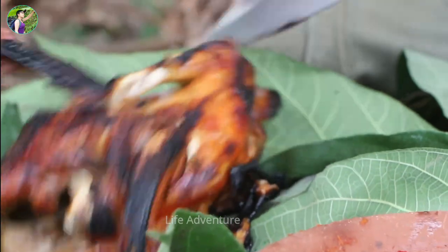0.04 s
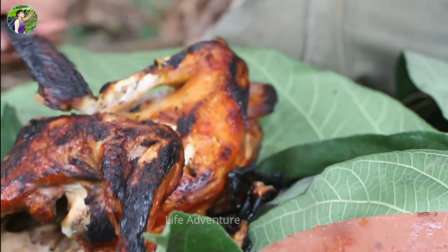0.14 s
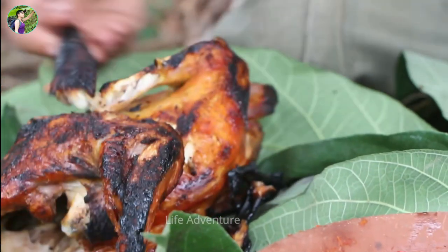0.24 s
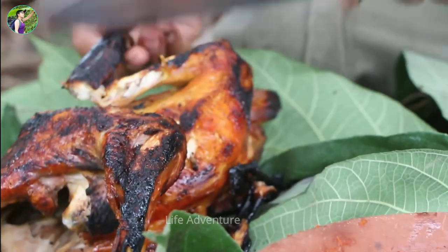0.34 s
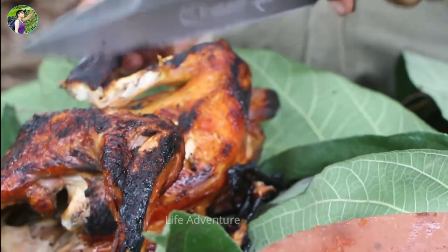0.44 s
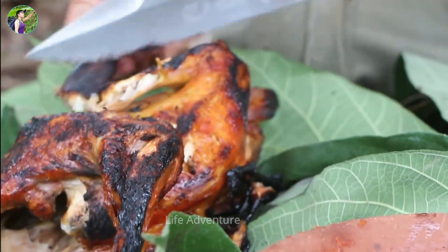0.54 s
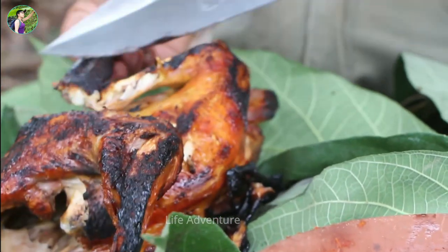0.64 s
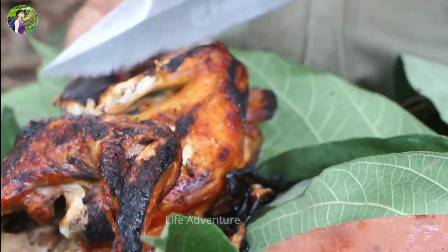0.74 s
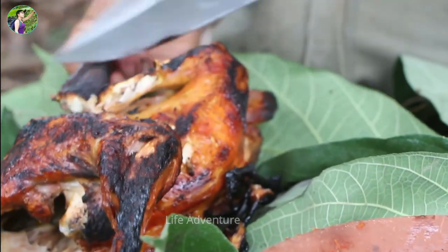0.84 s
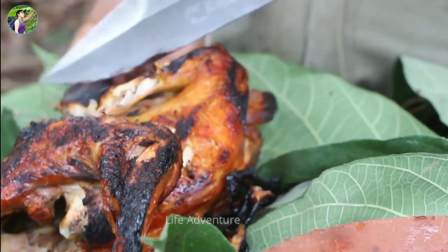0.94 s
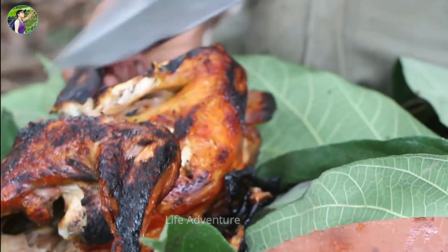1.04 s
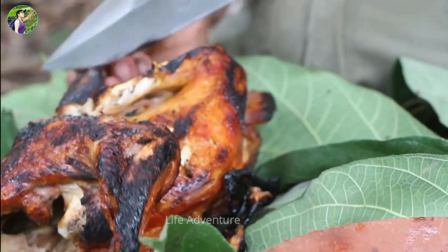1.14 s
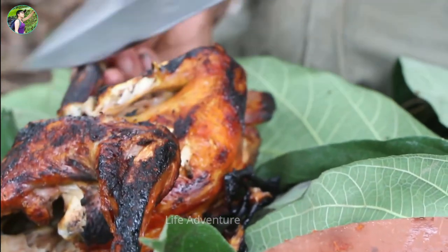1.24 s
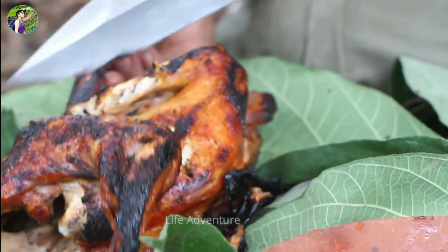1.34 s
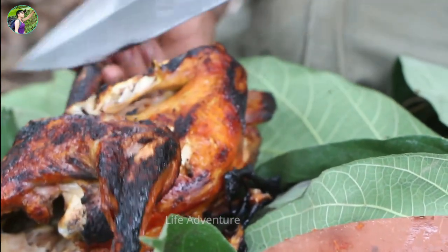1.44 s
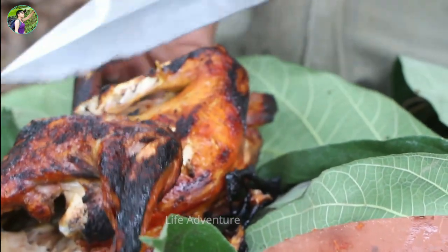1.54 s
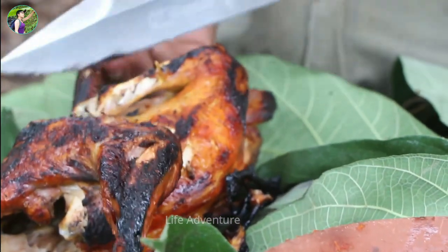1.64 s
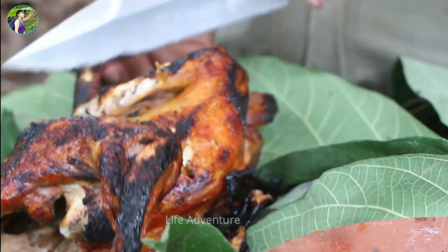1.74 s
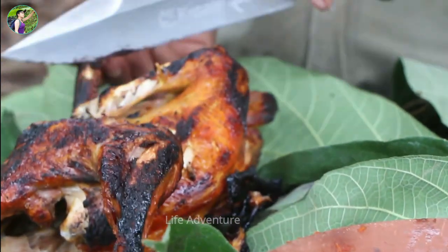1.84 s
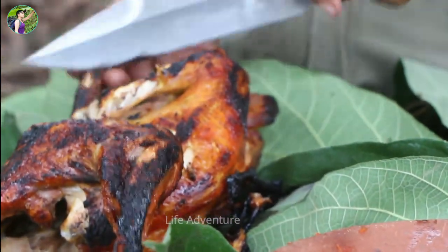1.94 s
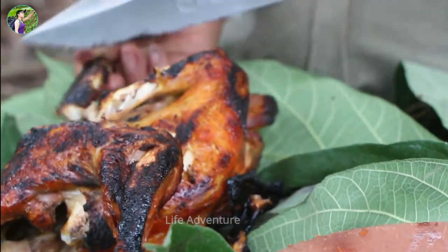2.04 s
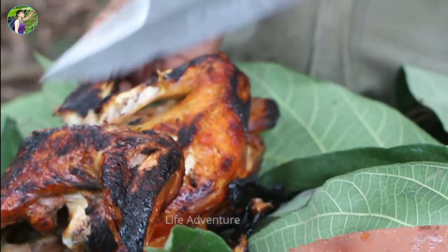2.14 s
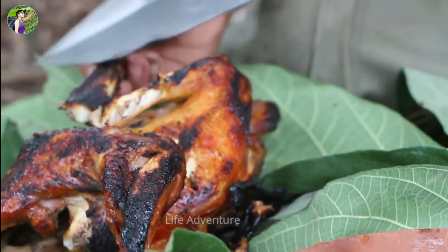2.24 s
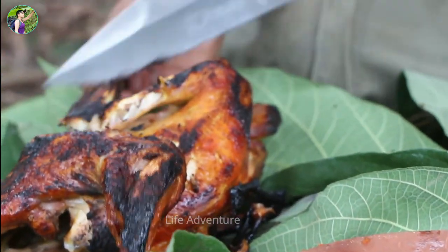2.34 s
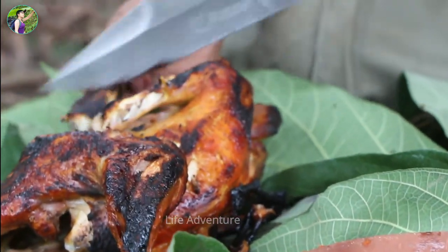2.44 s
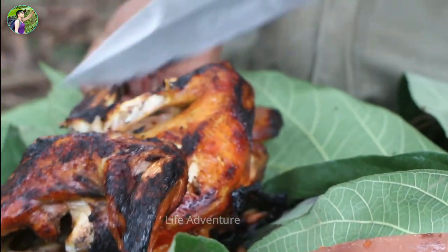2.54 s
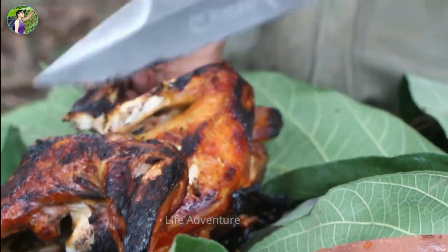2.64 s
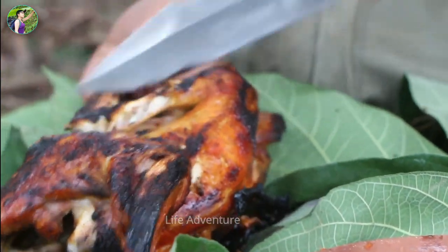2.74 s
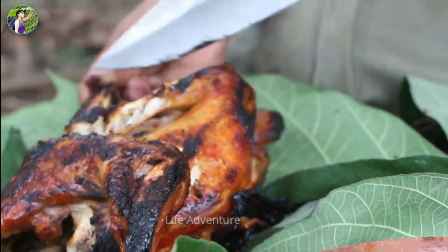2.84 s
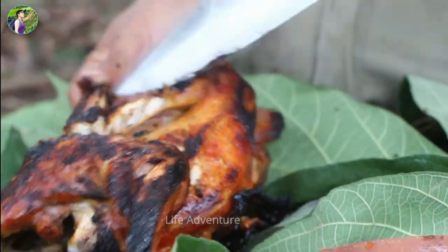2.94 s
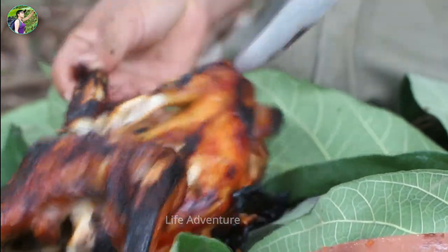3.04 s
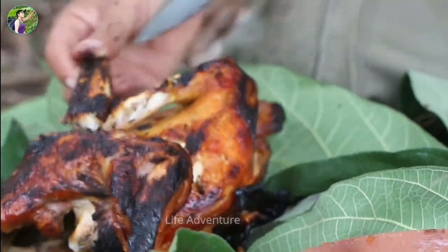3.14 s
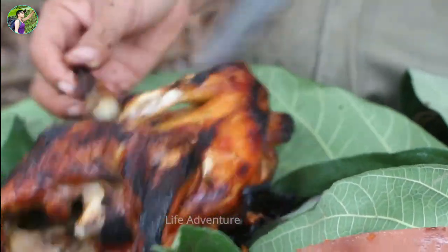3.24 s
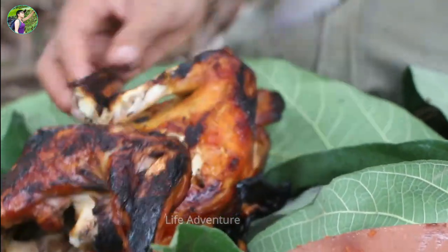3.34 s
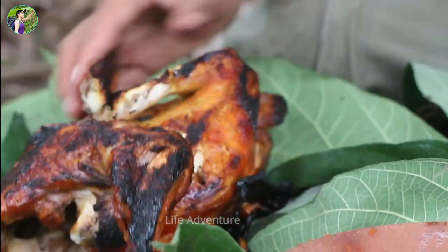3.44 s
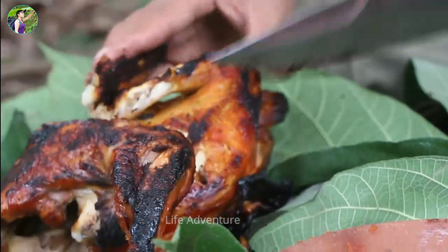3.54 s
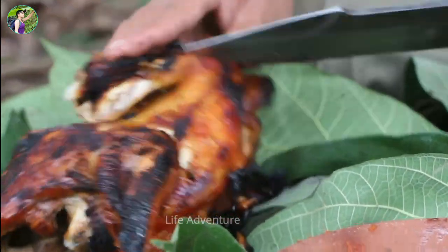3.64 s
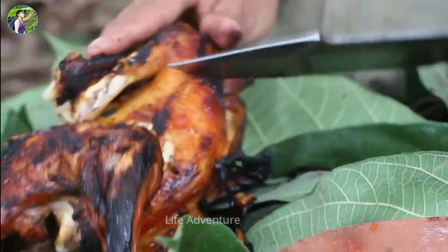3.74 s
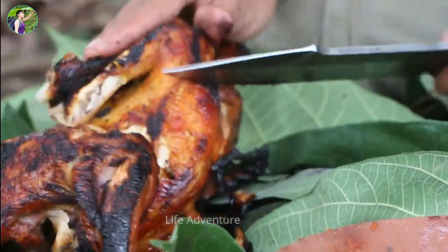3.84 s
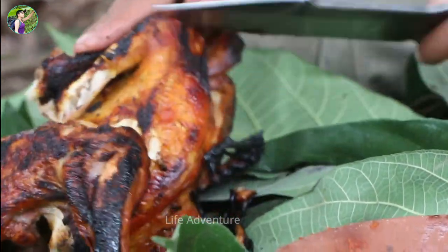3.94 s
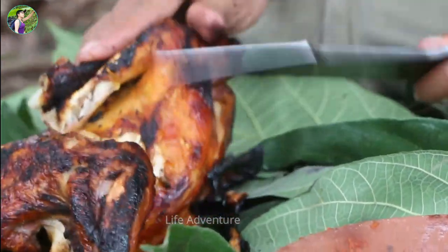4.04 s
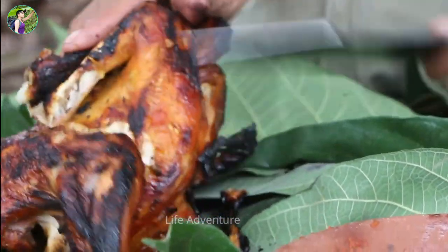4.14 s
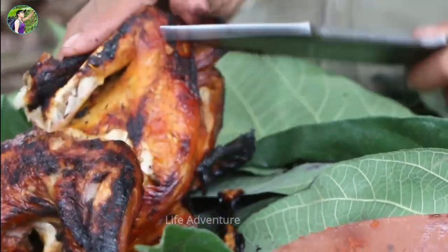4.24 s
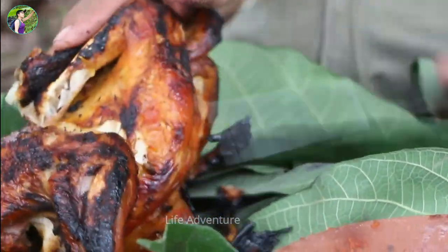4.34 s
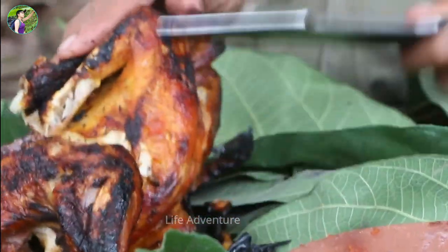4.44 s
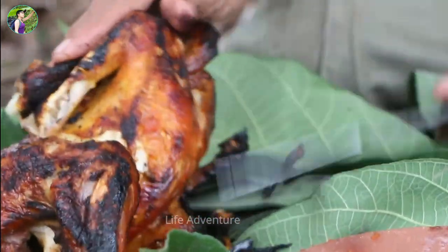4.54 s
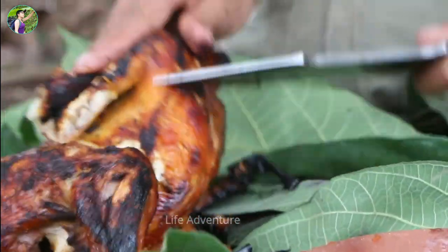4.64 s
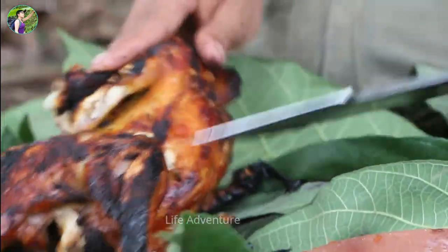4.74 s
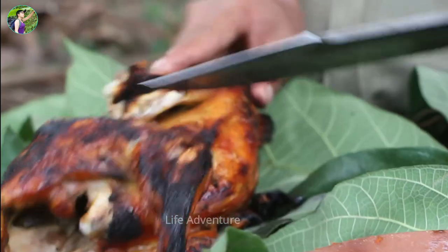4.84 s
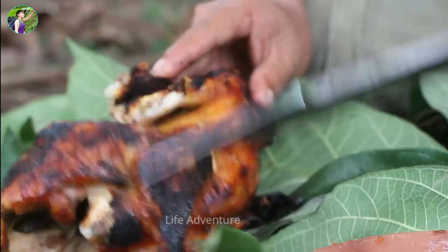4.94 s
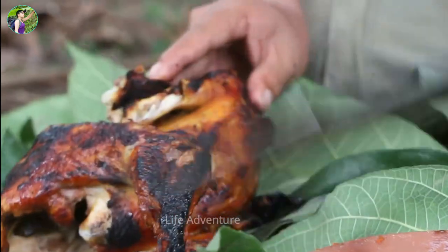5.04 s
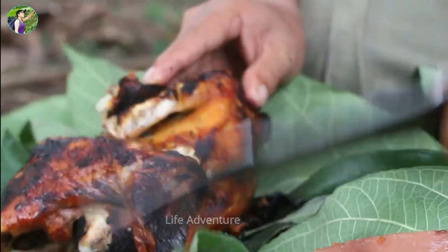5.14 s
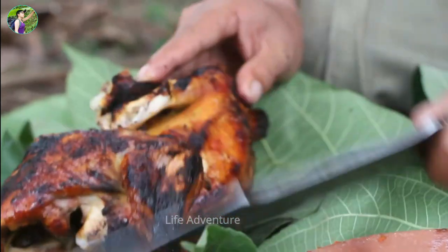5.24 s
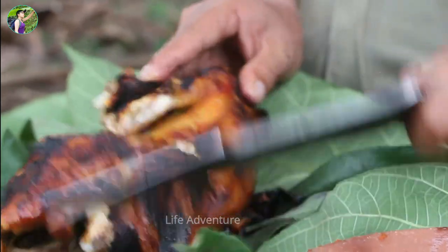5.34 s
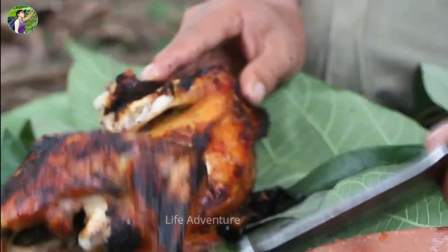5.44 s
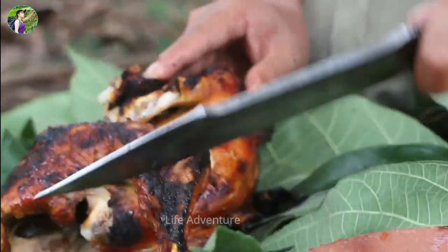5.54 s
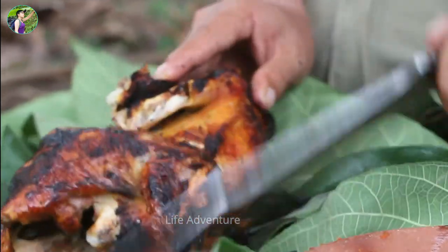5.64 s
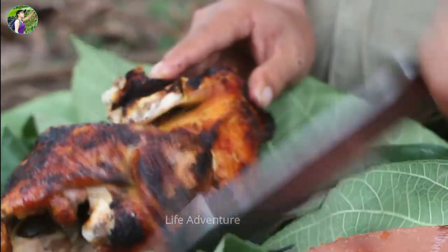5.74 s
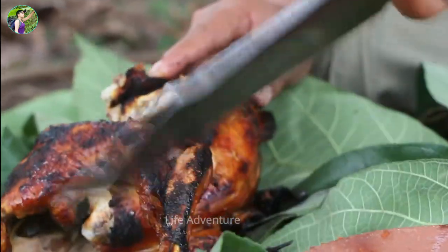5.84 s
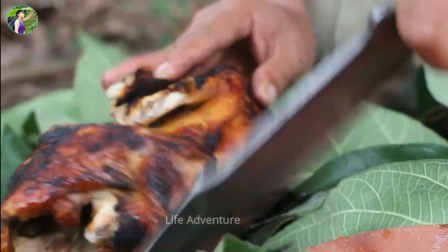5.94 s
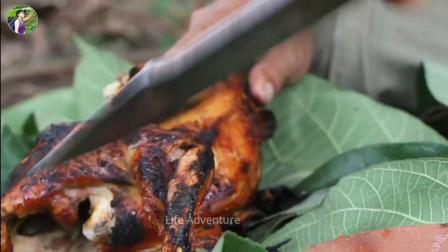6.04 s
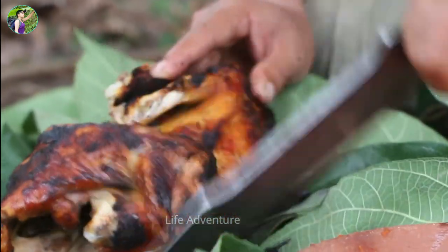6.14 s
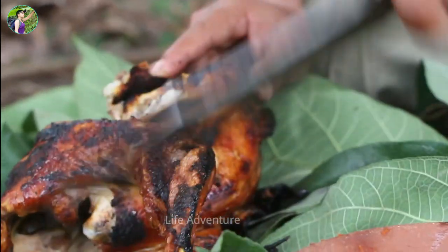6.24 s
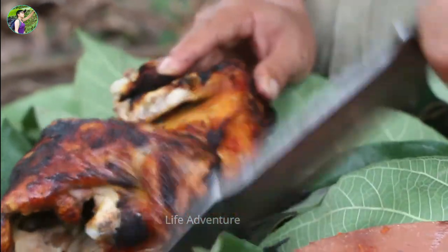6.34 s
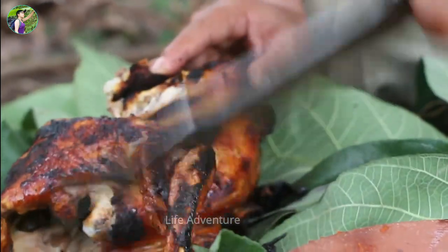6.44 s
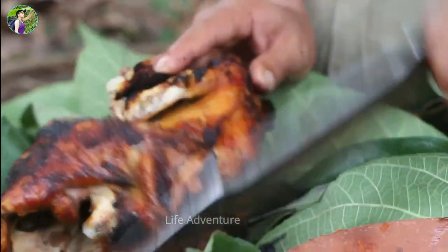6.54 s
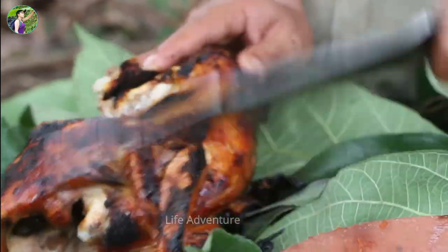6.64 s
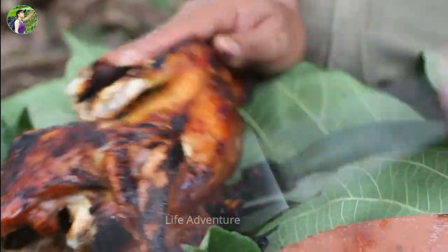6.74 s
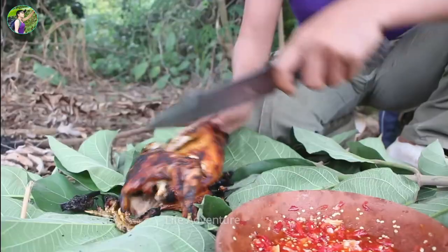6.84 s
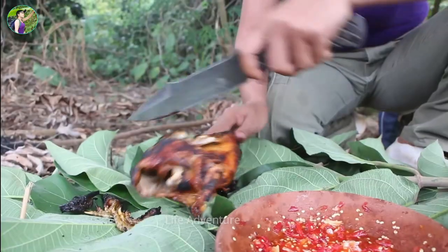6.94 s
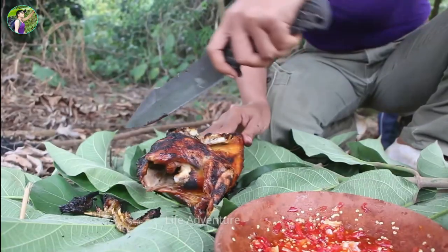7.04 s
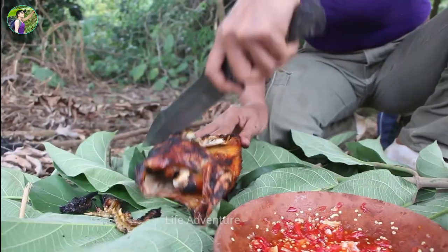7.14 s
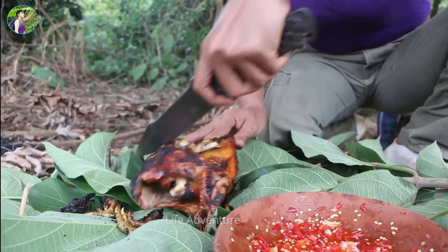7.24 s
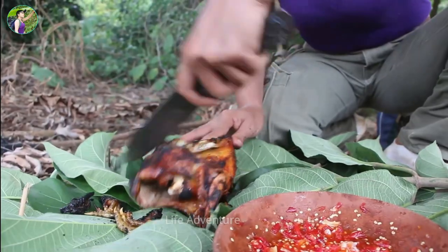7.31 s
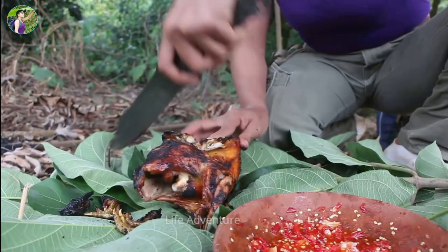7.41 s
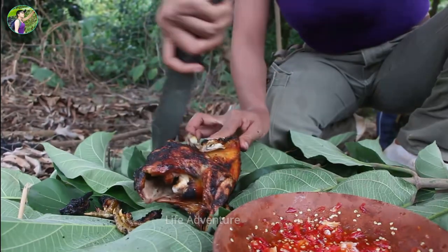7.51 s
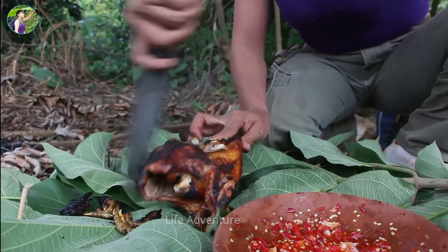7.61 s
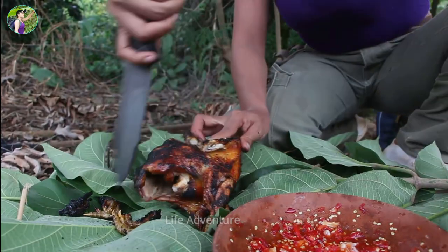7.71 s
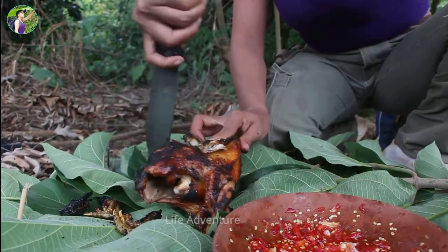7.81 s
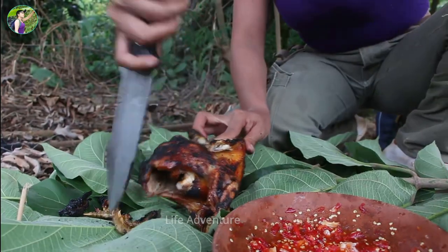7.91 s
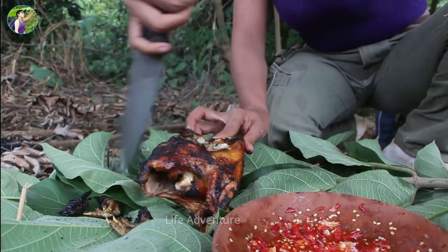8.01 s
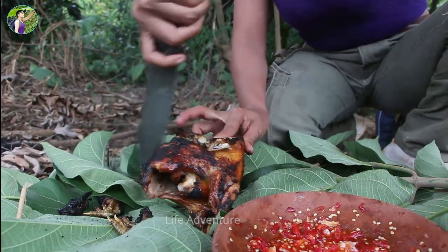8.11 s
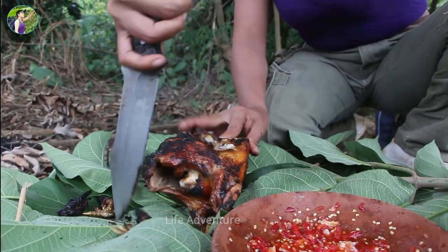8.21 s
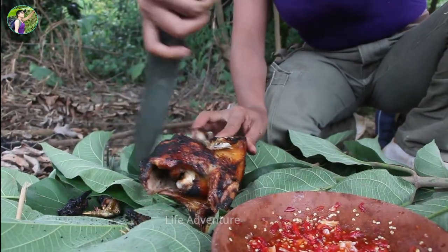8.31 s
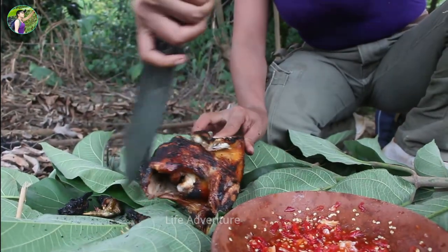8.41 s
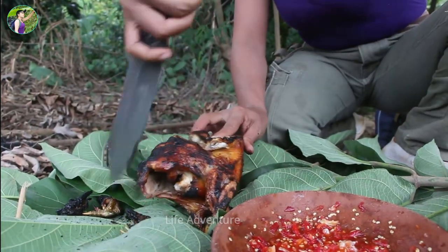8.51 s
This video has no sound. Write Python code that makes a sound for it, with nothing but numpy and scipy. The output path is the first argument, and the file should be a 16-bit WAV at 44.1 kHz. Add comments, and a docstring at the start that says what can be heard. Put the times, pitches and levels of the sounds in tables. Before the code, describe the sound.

Rapid metallic scrapes and light knocks of a big blade on charred chicken crust and bone, over leaves outdoors.

```python
"""A large knife taps and saws across the charred crust and bones of a roast chicken on leaves, outdoors.
Grit under the edge and short impacts excite the modes of the hand-damped blade; the crust crackles
and the bird thuds. Leaves rustle, the air hisses, and a faint hum stops early on.
The work lies to the right of a stereo microphone; near 6.8 s the sound fades out and in once."""
import sys
import numpy as np
from scipy import signal
from scipy.io import wavfile
from scipy.ndimage import uniform_filter1d

SR = 44100
rng = np.random.default_rng(int(sys.argv[2]) if len(sys.argv) > 2 else 0)


def put_to_file(sound):
    """Save the sound as 16-bit audio at rate SR, in the file named by the first command-line argument."""
    columns = np.atleast_2d(sound).T  # one column per channel
    safe = np.clip(columns, -1, 1)
    whole_steps = np.round(safe * 32767)
    wavfile.write(sys.argv[1], SR, whole_steps.astype(np.int16))


N = 377937


def knife():
    """Source and resonator: friction and impact at the edge drive both the blade and the bird."""
    pressure, low_db, main_db = strokes()
    edge, push = taps()
    scrape = pressure * wander(hz=71, spread=0.6, scale=amp) * grit(per_s=14000, spread_db=0.5)
    force = scrape + signal.lfilter([.1], [1, -.7], edge)  # a blunt blow holds less treble
    return highpass(blade(force, crust(force, edge), low_db, main_db) + bird(scrape, push), hz=170)


# Saw strokes. Each row: start, rise, hold and release in seconds, then scrape level, change over
# the hold, and gains of the blade's lowest and main modes, all in dB.
STROKES = [ (0.037, 0.024, 0.022, 0.016, -29, -5.5, -6, 2),
           (0.456, 0.027, 0.0057, 0.046, -34.5, -1.5, -9.5, -4.5),
           (0.593, 0.0025, 0.04, 0.06, -29, 0, -5, -7), (0.777, 0.0049, 0.077, 0.025, -29, 5, -9, -5.5),
           (0.976, 0.0042, 0.011, .015, -25.5, -0.5, -11.5, -6.5),
           (1.0, 0.0094, 0.05, 0.035, -23, -4.5, -5.5, -4.5),
           (1.098, 0.0071, 0.0065, 0.018, -28.5, 0.5, -11, 0),
           (1.171, .012, 0.041, .028, -30, 4.5, -2.5, 1),
           (1.295, 0.022, .004, 0.019, -28.5, -7, -9.5, -5.5),
           (1.385, 0.019, 0.042, 0.039, -25, 0.5, -5, -5),
           (1.488, 0.014, 0.01, 0.0081, -30.5, -0.5, -12, -5), (1.584, 0.013, 0.033, .07, -31, 5, -6.5, -8),
           (1.772, 0.024, .048, 0.021, -24, -3.5, -8.5, -8),
           (1.968, 0.014, 0.029, 0.028, -23, -3.5, -4, -8.5),
           (2.173, 0.036, 0.039, 0.031, -32.5, 1, -7, -7),
           (2.38, 0.0089, 0.038, 0.037, -24.5, -1.5, -6, -1.5),
           (2.473, .012, .003, 0.015, -32, -1, -12, -5), (2.553, 0.012, 0.042, 0.047, -26, 1.5, -6.5, -6.5),
           (2.76, 0.028, 0.036, 0.036, -29, -6.5, -5, -3), (3.019, 0.018, 0.034, 0.0056, -34, 9.5, -12, 2),
           (3.285, 0.018, 0.021, 0.0057, -33, 2.1, -4.5, 0.5), (3.895, 0.011, .005, .02, -42.5, 0, -29, -6),
           (4.097, 0.011, 0.013, 0.039, -32.5, 1.5, -24, -10),
           (4.31, 0.021, .004, .05, -27, -2.5, -7, -7.5), (4.509, 0.026, 0.035, 0.038, -34.5, -7, -17, -9),
           (4.713, .005, 0.042, .02, -43.5, -3, -13, -10), (4.961, .008, 0.0046, .015, -46, -4, -18, -8),
           (4.993, 0.013, 0.017, 0.018, -40.5, 8.5, -16, -4.5),
           (5.208, 0.021, 0.014, 0.064, -23, 3, -11.5, -19),
           (5.411, 0.037, 0.03, 0.086, -21.5, -4, -17.5, -10),
           (5.687, 0.043, 0.034, 0.038, -22, -3.5, -9, -8),
           (5.971, 0.011, 0.028, 0.011, -22, -4, -12.5, -3.5),
           (6.158, 0.034, 0.054, 0.021, -22.5, -15, -9, -3), (6.365, 0.035, 0.024, 0.034, -25, -1, -7, -5),
           (6.569, 0.027, 0.032, 0.021, -27.5, -2, -6.5, -7),
           (7.368, 0.018, 0.0023, 0.018, -32, -7, -24, -10.5),
           (7.531, 0.0033, 0.02, 0.012, -24.5, -6, -27, -13),
           (7.611, 0.022, 0.017, 0.016, -21.5, 3, -44, -6),
           (7.667, 0.0045, 0.0049, 0.01, -18, -2.5, -11, -10),
           (7.89, .01, 0.044, 0.043, -18.5, -8.5, -18.5, -9), (8.16, .007, 0.013, 0.051, -23, 7, -20, -10),
           (8.432, 0.023, 0.042, .018, -18.5, -14, -16, -15), ]

def strokes(touch_db=-10.5, lift_db=-26):
    """Sliding friction: each stroke presses, holds and lifts; where it bites weights the strong modes."""
    pressure = np.zeros(N)
    for start, rise, hold, release, db, change_db, *_ in STROKES:
        times = np.cumsum([start, rise, hold, release])
        a, b = round(times[0] * SR), round(times[-1] * SR)
        shape = list(zip(times, [touch_db, 0, change_db, change_db + lift_db]))
        pressure[a:b] += amp(db + curve(shape, a, b)[0]) * signal.windows.tukey(b - a, .12)
    mode_gains = [(s + rise + hold / 2, low, main) for s, rise, hold, *_, low, main in STROKES]
    return pressure, *curve(mode_gains)


# Knocks of the edge. Each row: start in seconds, click and thud levels in relative dB.
TAPS = [(0.0227, -16.5, -16), (0.4356, -22.5, -42), (0.597, -19.5, -34.5), (1.278, -21.5, -80),
        (1.38, -25.5, -38.5), (1.578, -13, -54), (1.76, -19, -51), (1.881, -20.5, -50.5),
        (1.897, -29.5, -49), (1.9594, -14, -33), (2.17, -19, -29.5), (2.386, -17, -37),
        (2.5012, -16.5, -58), (2.564, -19, -24), (2.758, -12, -24), (2.999, -29, -25.5),
        (3.2723, -43, -24.5), (3.799, -26.5, -33), (3.91, -28, -61), (4.028, -19.5, -46),
        (4.2585, -29, -35), (4.362, -28.5, -34), (4.504, -32.5, -42), (4.5707, -29, -28),
        (4.5885, -20.5, -26.5), (4.628, -28, -53), (5.024, -21, -24), (5.2017, -23, -27),
        (5.394, -28, -36.5), (5.5653, -16, -30.5), (5.67, -25, -32), (5.811, -21, -43),
        (5.9418, -16, -32.5), (6.151, -31, -28), (6.361, -28, -24.5), (6.555, -30, -25.5),
        (6.9727, -34, -21.5), (7.196, -12.5, -30), (7.247, -37, -27.5), (7.3811, -11, -25.5),
        (7.5322, -16.5, -50), (7.5621, -14.5, -20.5), (7.648, -11.5, -30), (7.8409, -27, -26),
        (8.1236, -22.5, -20), (8.305, -27.5, -39.5), (8.3918, -9, -22)]

def taps(contact_s=0.002, shove_s=0.0032):
    """Impact: each tap is a short decaying force on the edge and a longer push on the bird."""
    edge, push, t = np.zeros(N), np.zeros(N), np.arange(512) / SR
    rise = 1 - np.exp(-t / 0.00034)
    for (s, click_db, thud_db), noise in zip(TAPS, rng.standard_normal((len(TAPS), 2, len(t)))):
        edge[round(s * SR):][:len(t)] += amp(click_db) * evened(noise[0] * rise * np.exp(-t / contact_s))
        push[round(s * SR):][:len(t)] += amp(thud_db) * evened(noise[1] * rise * np.exp(-t / shove_s))
    return edge, push


# Blade modes, the strong lowest and main ones first. Each row: frequency and width in Hz, relative dB.
BLADE_MODES = [(1305.3, 194, 0), (3556, 293, 0.5), (2337, 149, -4), (3004, 197, -1.5), (4050, 335, -3),
               (5174, 115, 7.5), (5610, 180, -1), (6400, 59, 8.5), (6750, 270, -2.5), (7300, 70, 5.5),
               (7805, 600, -3.5), (9000, 300, -4.5), (9600, 124, 3), (10850, 61, -7), (11125, 92, 3),
               (12830, 140, -2.5), (14350, 240, -11.5)]
# The shifting grip. Each row: time in seconds, gains of the treble and the second-lowest mode in dB.
GRIP = [(0, -5.5, 3), (1.2, -8.5, -2.5), (2.7, -5.5, 2.5), (3.2, -4.5, -2), (4.0, -5, -6.5),
        (5.2, -5.5, -2), (6.4, -6.5, -5), (7.3, -7.5, -1), (7.9, -9, -0.5), (8.5, -9, -4)]

def blade(force, crackle, low_db, main_db, split_hz=4700):
    """Modal superposition: damped modes swell as the edge slides, mixed by band with the crackle."""
    drift = wander(hz=9.4, spread=0.013)  # grip and load bend the two strong modes
    strong = [ring(force * wander(hz=30, spread=2.4, scale=amp), *mode, drift, order=2)
              for mode in BLADE_MODES[:2]]
    weak = [ring(force * wander(hz=6, spread=3.9, scale=amp), *mode) for mode in BLADE_MODES[2:]]
    treble_db, second_db = curve(GRIP)
    weak[0] *= amp(second_db)
    treble = highpass(crackle, split_hz)
    middle = crackle - treble
    for k, (hz, _, _) in enumerate(BLADE_MODES[2:]):
        band = middle if hz < split_hz else treble
        band += (-1) ** k * weak[k]  # neighbours move in opposite sense at the edge
    parts = zip([*strong, middle, treble], [low_db, main_db, -6.5, treble_db])
    return np.std(force) * sum(amp(db) * evened(part) for part, db in parts)


# Crackle spectrum. Each row: frequency in Hz, relative level in dB.
CRUST_SPECTRUM = [(300, -20), (800, 6.5), (1800, 4), (3500, 3), (6000, -2), (9000, 5.5), (12000, 6.5),
                  (15500, -42.5)]

def crust(force, edge):
    """Brittle fracture: the crust cracks in dry, broadband clicks under strokes and taps."""
    return amp(-18.5) * colour(force + 0.09 * edge, CRUST_SPECTRUM)


# Body modes. Each row: frequency and width in Hz, relative level in dB.
BIRD_MODES = [(328, 145, -2), (672, 120, -0.5), (813, 153, -3.5), (1493, 164, -1.5)]
# Crunch of the flesh. Each row: time in seconds, share of the scrape in dB.
CRUNCH = [(0, -16), (1.0, -24), (2.0, -23), (2.4, -22.5), (2.6, -14), (2.8, -14), (3.3, -10), (4.3, -12.5),
          (5.0, -14.5), (6.6, -9.5), (7.4, -11), (7.65, -25), (8.5, -27.5)]
# Cuts nearer the thick end thud deeper. Each row: time in seconds, gain of the lowest mode in dB.
HEFT = [(0, -2), (.6, 7), (2.4, -0.5), (2.8, -3), (3.3, 1), (4.2, 1), (7.7, -2), (8.1, 7)]

def bird(scrape, push):
    """Forced vibration: the heavily damped body thuds when pushed and crunches when scraped."""
    drive = amp(-10) * push + amp(curve(CRUNCH)[0]) * scrape
    lowest, *upper = [ring(drive, *mode) for mode in BIRD_MODES]
    body = amp(curve(HEFT)[0]) * lowest + sum(upper)
    return body * np.std(drive) / np.std(body)


# Steady rustle of hands and leaves. Each row: time in seconds, relative level in dB.
STEADY_RUSTLE = [(0, -55.5), (.4, -65.5), (.9, -56), (2.5, -57), (3.55, -59.5), (3.72, -46), (4.2, -59),
                 (4.9, -49), (5.15, -53.5), (6.5, -56), (6.9, -47.5), (7.2, -59), (7.6, -54.5),
                 (8.3, -50.5), (8.55, -56)]
# Single rustles. Each row: peak time in seconds, relative level in dB, fall time in seconds.
RUSTLES = [(.15, -49.5, 0.025), (.23, -54, 0.055), (.35, -55.5, 0.11), (3.12, -51.5, 0.11),
           (3.38, -55, 0.26), (3.8, -51.5, 0.37), (4.06, -44.5, 0.19), (4.258, -53.5, 0.12),
           (4.389, -38.5, 0.083), (4.63, -46, 0.049), (4.73, -51, 0.22), (4.9, -48, 0.031),
           (5.598, -46, 0.02), (5.84, -44, 0.044), (6.059, -42.5, 0.01), (6.67, -44, 0.016),
           (6.74, -59.5, .2), (6.998, -45.5, 0.084), (7.25, -37.5, 0.041), (7.34, -50, 0.093),
           (7.47, -59, 0.1), (8.26, -61, 0.049), (8.31, -70, .06), (8.35, -54.5, 0.6)]
# Rustle spectrum. Each row: frequency in Hz, relative level in dB.
LEAF_SPECTRUM = [(88, -39), (150, -17.5), (253, -5), (471, -11), (781, -1), (985, -11), (1090, -7.5),
                 (1540, -5.5), (1910, -7.5), (5130, -15), (5540, -19.5), (9920, -27.5), (15500, -40.5)]

def leaves(rise_s=0.089, depth_db=-20.5):
    """Shot noise: clumps of tiny clicks merge into a rustle that swells and falls away."""
    grains = grit(per_s=10000, spread_db=2.0) * wander(hz=35, spread=1.6, scale=amp)
    level, t = amp(curve(STEADY_RUSTLE)[0]), np.arange(N) / SR
    for peak_s, db, fall_s in RUSTLES:
        level += amp(db + depth_db * np.maximum((peak_s - t) / rise_s, (t - peak_s) / fall_s))
    return level * evened(colour(grains, LEAF_SPECTRUM))


# Hiss spectrum. Each row: frequency in Hz, relative level in dB.
AIR_SPECTRUM = [(15, -71), (25, -36), (178, -4), (253, -7), (399, -13.5), (445, -39), (523, -21.5),
                (614, -23), (997, -18), (1140, -15.5), (6920, -23), (14300, -44.5), (15500, -64)]
# Likeness of the channels. Each row: frequency in Hz, correlation from 0 to 1.
AIR_COHERENCE = [(60, 0.39), (200, 0.24), (700, 0.057), (1500, 0.018)]
# Balance of the hiss. Each row: frequency in Hz, left minus right in dB.
AIR_BALANCE = [(80, 3), (200, -8), (1500, -5.5), (8000, -6), (15000, 0)]

def air(level_db=-48):
    """Diffuse field: a patchy outdoor hiss whose channels grow less alike as frequency rises."""
    frames, hz = N // 256 + 5, np.fft.rfftfreq(1024, 1 / SR)
    a, b, c, d, patches = rng.standard_normal((frames, len(hz), 5)).T
    patches = uniform_filter1d(patches, size=10, axis=0)  # smooth over frequency
    patches = evened(uniform_filter1d(patches, size=14, axis=1))  # and over time
    right, independent = a + 1j * b, c + 1j * d
    coherence = read(AIR_COHERENCE, hz)[:, None]
    left = coherence * right + np.sqrt(1 - coherence ** 2) * independent
    left *= amp(read(AIR_BALANCE, hz))[:, None]
    spectra = np.array([left, right]) * amp(read(AIR_SPECTRUM, hz)[:, None] + 2.8 * patches)
    return amp(level_db) * evened(signal.istft(spectra, nperseg=1024, noverlap=768)[1][:, :N])


# A faint low tone. Each row: time in seconds, rms level in dB.
HUM_LEVEL = [(0, -54.5), (.64, -54), (.72, -79)]

def hum(hz=104.4):
    """Simple harmonic motion: one sine tone that all but vanishes by 0.7 s."""
    return np.sqrt(2) * amp(curve(HUM_LEVEL)[0]) * np.sin(2 * np.pi * hz * np.arange(N) / SR)


def echoes(x, t60, sets=3, turn_hz=9):
    """Reflection off ground, leaves and legs: echo sets take turns, as the paths change with the hands."""
    t, turns = np.arange(SR // 5) / SR, np.arange(N) / SR * turn_hz
    out = np.zeros(N)
    for k, noise in enumerate(rng.standard_normal((sets, len(t)))):
        response = noise * amp(-60 * t / t60)
        window = np.sqrt(2 / sets) * np.cos(2 * np.pi * (turns + k / sets))  # squares sum to one
        out += signal.oaconvolve(x * window, response / np.linalg.norm(response))[:N]
    return out


def ring(x, hz, width, db, detune=None, order=1):
    """Damped resonance with peak gain db; detune bends its pitch by a fraction."""
    bend = 1 if detune is None else np.exp(2j * np.pi * np.cumsum(hz * detune) / SR)
    radius, out = np.exp(-np.pi * width / SR), x / bend
    for _ in range(order):
        out = signal.lfilter([1 - radius], [1, -radius * np.exp(2j * np.pi * hz / SR)], out + 1e-18)
    return 2 * amp(db) * (bend * out).real


def grit(per_s, spread_db):
    """Poisson process: random clicks, a few of them large."""
    size = amp(spread_db * np.minimum(rng.exponential(1, N), 4)) * rng.standard_normal(N)
    return evened(size * (rng.random(N) < per_s / SR))


def wander(hz, spread, scale=np.asarray, hop=100):
    """Random modulation: low-passed noise of rms spread, passed through scale."""
    knots = rng.standard_normal(N // hop + 2)
    slow = signal.lfilter([1], [1, -np.exp(-2 * np.pi * hz * hop / SR)], knots)
    return np.interp(np.arange(N) / hop, np.arange(len(knots)), scale(spread * evened(slow)))


def colour(x, spectrum):
    """Minimum-phase filter: the phase follows from the Hilbert transform of the log gain."""
    hz = abs(np.fft.fftfreq(4096, 1 / SR))
    log_gain = np.log(amp(read(spectrum, hz)))
    response = np.fft.ifft(np.exp(np.conj(signal.hilbert(log_gain)))).real
    return signal.oaconvolve(x, response[:2048])[:N]


def highpass(x, hz):
    """Second-order roll-off below hz."""
    return signal.sosfilt(signal.butter(2, hz, "high", fs=SR, output="sos"), x)


def amp(db):
    """Decibels to amplitude ratio."""
    return 10 ** (np.asarray(db) / 20)


def evened(x):
    """Normalisation to rms 1."""
    return x / np.sqrt(np.mean(x ** 2) + 1e-20)


def read(spectrum, hz):
    """Interpolation over log frequency."""
    knots_hz, values = np.transpose(spectrum)
    return np.interp(np.log(hz + 1), np.log(knots_hz + 1), values)


def curve(rows, start=0, stop=N):
    """Interpolation of each column over time, one value a sample."""
    times, *columns = np.transpose(rows)
    return [np.interp(np.arange(start, stop) / SR, times, column) for column in columns]


# Response of the left port, which faces away. Each row: frequency in Hz, gain in dB.
OFF_AXIS = [(100, -4.5), (400, -6), (1300, -13.5), (4400, -15), (15000, -12)]
# The work moves. Each row: time in seconds, left gain in dB.
LEFT_GAIN = [(3.4, 1.3), (3.8, 3.5), (5, 2), (6.8, 2.5), (6.9, 4.5)]

def scene():
    """Directivity: the work reaches the microphone's right port straight and its left port dimmed."""
    near = amp(7.0) * (knife() + leaves())
    close = echoes(near, t60=0.054)
    scattered = close - signal.lfilter([.09], [1, -.9], close)  # small things scatter only the treble
    off_axis = colour(amp(-7.5) * near + amp(-2.0) * scattered, OFF_AXIS)
    left = amp(curve(LEFT_GAIN)[0]) * off_axis + amp(-20) * echoes(near, t60=0.11)
    right = near + amp(-14.0) * echoes(near, t60=0.19)
    return np.array([left, right]) + air() + hum()


# A brief dip in level. Each row: time in seconds, gain in dB.
FADE = [(6.775, -1.5), (6.795, -16), (6.808, -50), (6.84, -49), (6.85, -20), (6.87, -1.5)]

def record(dry):
    """Gain and band limiting: one short fade out and in, then a low-pass at 15.6 kHz."""
    faded = dry * amp(curve(FADE)[0])
    lowpass = signal.firwin(255, 15600, window=("kaiser", 9), fs=SR)
    return signal.oaconvolve(faded, lowpass[None], "same")


dry = scene()
out = record(dry)
put_to_file(out)
```